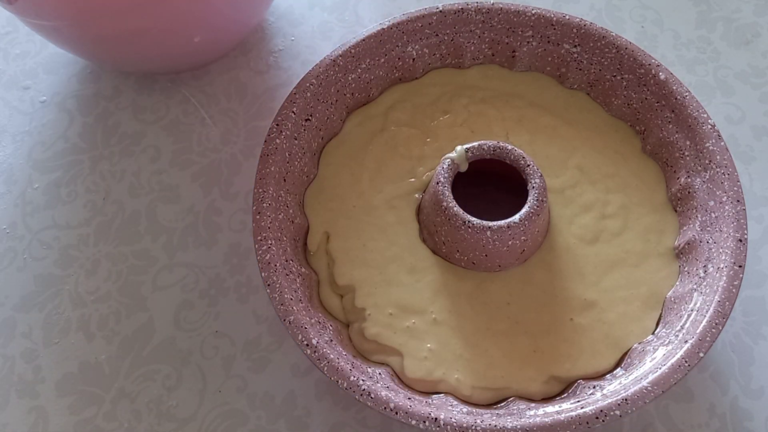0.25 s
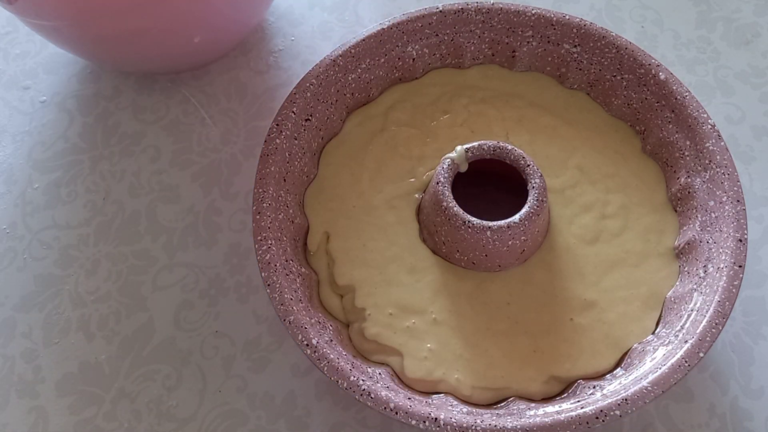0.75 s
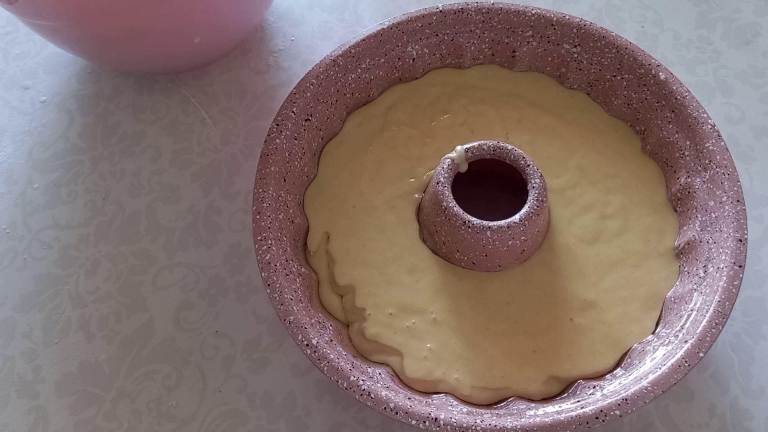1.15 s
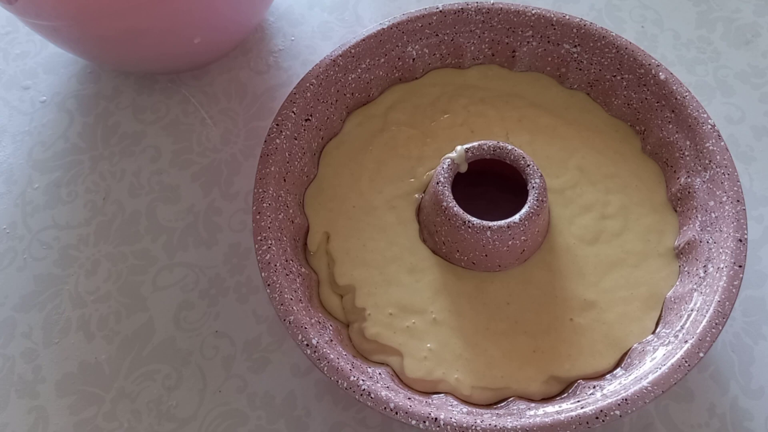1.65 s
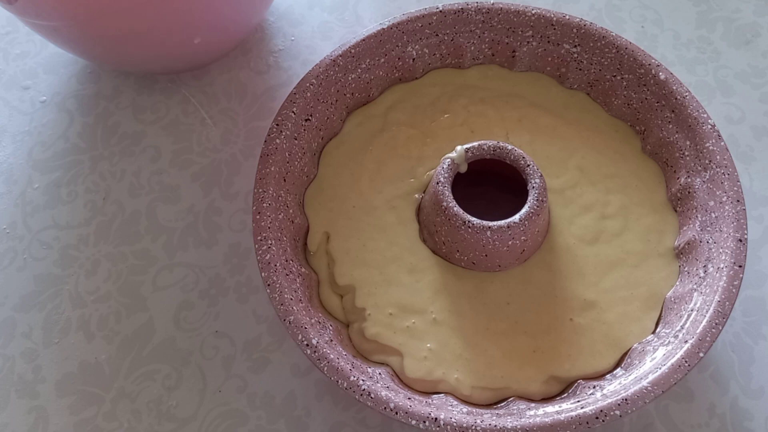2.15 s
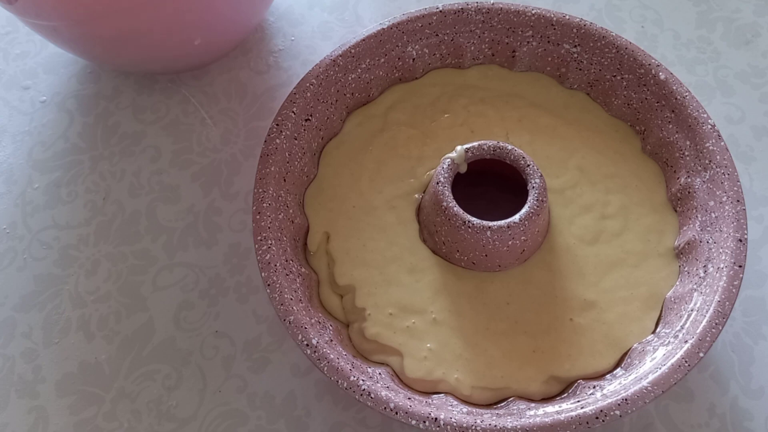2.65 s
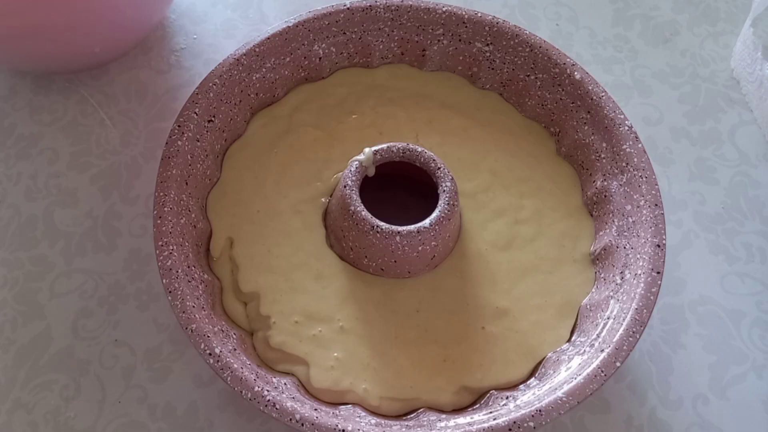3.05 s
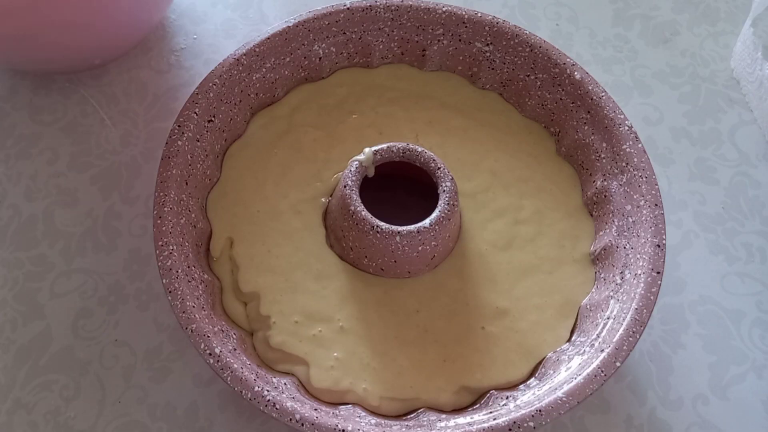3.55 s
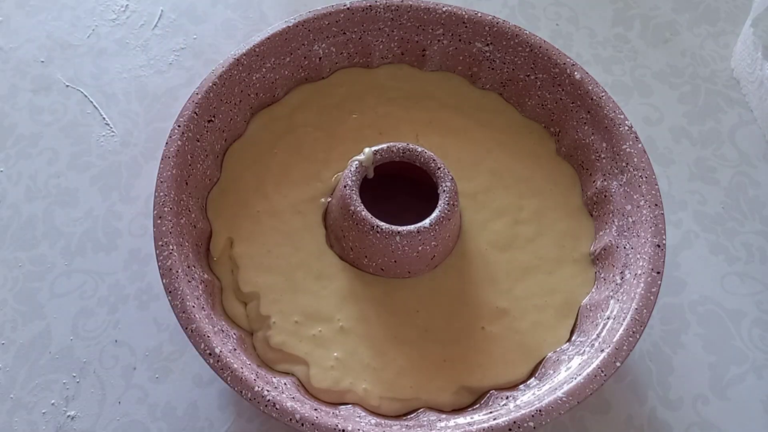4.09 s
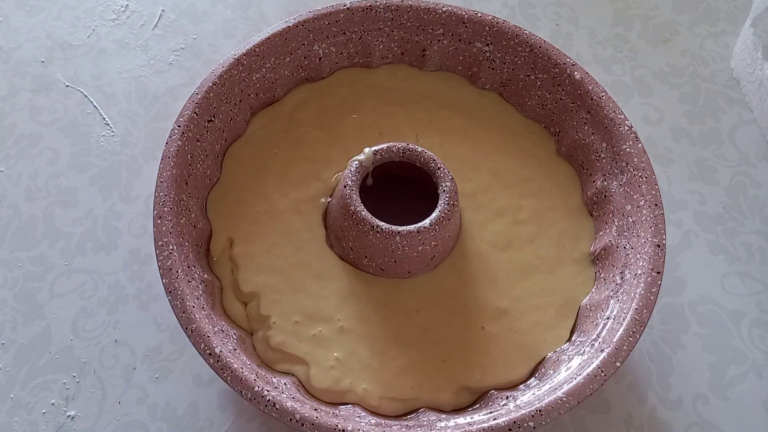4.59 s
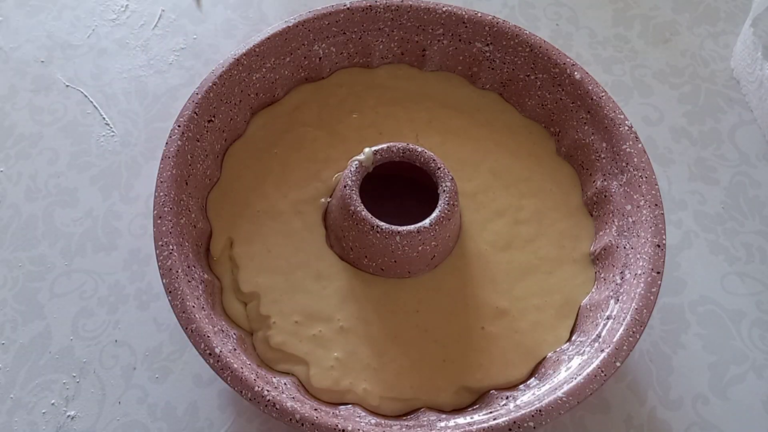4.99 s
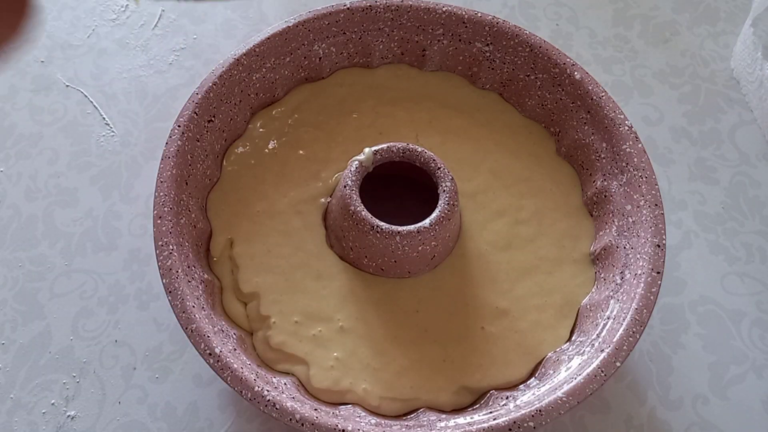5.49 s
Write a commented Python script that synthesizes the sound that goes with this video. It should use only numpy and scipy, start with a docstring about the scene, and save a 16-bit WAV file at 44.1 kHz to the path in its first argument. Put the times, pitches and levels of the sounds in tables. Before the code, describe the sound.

A faint, wavering appliance hum and a soft hiss run throughout in a small kitchen. From the start until about 0.8 seconds, a steel grater rattles and scrapes close by, its panels ringing briefly. Very light rubbing follows, then a second flurry builds from 1.4 seconds to the loudest clatter at 1.7. After a pause, a bowl judders across a wooden table from 2.7 to 3.4 seconds, with low rumbling, gritty scraping and small knocks. It clanks brightly at 3.1 and more softly just after. Faint hollow taps on a dish come at 3.7, a firm, clustered knock on the wood at 4.1, and more soft dish taps around 4.6. Lighter knocks fall between 5.2 and 5.5 seconds, along with three very faint, quick grating strokes. The louder sounds carry a slight, short room echo.

```python
"""A low, wavering appliance hum and a faint hiss lie under a small kitchen throughout. First a steel
grater is rattled and scraped in two flurries, tiny contacts ringing its panels, with light rubbing
between. From 2.7 s a bowl judders over the table among knocks on the wood, then clanks twice.
More knocks and soft hollow taps on a dish follow, and light grating strokes end it at about 5.4 s."""
import sys
import numpy as np
from scipy import signal
from scipy.fft import rfft, irfft, next_fast_len
from scipy.io import wavfile
from scipy.ndimage import uniform_filter1d

SR = 44100
rng = np.random.default_rng(int(sys.argv[2]) if len(sys.argv) > 2 else 0)


def pcm_store(signal):
    """Save signal as 16-bit PCM."""
    levels = np.round(np.clip(np.atleast_2d(signal), -1, 1) * 32767)
    wavfile.write(sys.argv[1], SR, levels.astype(np.int16).T)


N = 252693
TIME = np.arange(N) / SR
SPLIT_LOW_HZ, SPLIT_HIGH_HZ = 1000, 7000


def from_db(db):
    """dB to gain."""
    return 10 ** (np.asarray(db) / 20)


def unit_rms(x):
    """Scale to rms 1."""
    return x / np.sqrt(np.mean(x ** 2) + 1e-20)


def at_hz(points, hz):
    """Read a spectrum table on a log frequency axis."""
    points_hz, values = np.transpose(points)
    return np.interp(np.log(hz), np.log(points_hz), values)


def band(x, low_hz=None, high_hz=None):
    """Steep high-pass, low-pass or both."""
    for hz, kind in ((low_hz, "high"), (high_hz, "low")):
        if hz:
            x = signal.sosfilt(signal.butter(4, hz, kind, fs=SR, output="sos"), x)
    return x


def resonate(x, modes):
    """Parallel resonators of alternating sign, each (Hz, width in Hz, gain in dB)."""
    out = 0
    for k, (hz, width_hz, gain_db) in enumerate(modes):
        radius = np.exp(-np.pi * width_hz / SR)
        gain = (-1) ** k * from_db(gain_db) * (1 - radius ** 2) / 2
        feedback = [1, -2 * radius * np.cos(2 * np.pi * hz / SR), radius ** 2]
        out = out + signal.lfilter([gain, 0, -gain], feedback, x + 1e-18)
    return out


def steady(x, window_s):
    """A driven vibration keeps its strength: chance swells are divided out."""
    return x / np.sqrt(uniform_filter1d(np.mean(x ** 2, axis=0), int(window_s * SR)) + 1e-20)


def burst(t, rise_s, hold_s, t60_s):
    """Envelope: rises until t = 0, holds, decays."""
    attack = np.clip(1 + t / max(rise_s, 1e-3), 0, 1) ** 2
    return attack * from_db(-60 * np.clip(t - hold_s, 0, 1) / t60_s)


def swells(events, rise_s, t60_s):
    """One gain curve per dB column: a burst per row, powers added."""
    return np.sqrt(sum((from_db(levels_db)[:, None] * burst(TIME - time_s, rise_s, hold_s, t60_s)) ** 2
                       for time_s, hold_s, *levels_db in events))


# Likeness of the two ears. Each row: frequency in Hz, left-right correlation.
EAR_CORRELATION = [(30, 0.78), (130, .96), (250, 0.82), (500, 0.58), (1000, 0.31), (2000, 0.),
                   (15000, 0.057)]
def contacts(spectrum, per_s, spread_db):
    """Dense uneven clicks, coloured; the ears share the bass and differ in the treble."""
    clicks = (rng.random((2, N)) < per_s / SR) * rng.standard_normal((2, N))
    clicks *= from_db(spread_db * np.minimum(rng.exponential(1, (2, N)), 4))
    size = next_fast_len(N)
    hz = np.arange(size // 2 + 1) * SR / size + 1
    alike = np.clip(at_hz(EAR_CORRELATION, hz), -1, 1)
    coloured = rfft(clicks, size) * from_db(at_hz(spectrum, hz))
    mid, side = coloured * np.sqrt([1 + alike, 1 - alike])
    return unit_rms(irfft([mid + side, mid - side], size)[:, :N])


# Wavering of the hum. Each row: time in seconds, level in dB.
HUM_LEVELS = [(0, -67), (.65, -58), (.9, -68.5), (1.7, -60.5), (2.6, -71), (3.65, -63.5), (4.45, -66.5),
              (4.6, -62.5), (5.07, -59.5), (5.2, -69), (5.4, -56), (5.62, -71.5), (5.73, -65)]
# Hum resonances. Each row: frequency in Hz, width in Hz, gain in dB.
HUM_MODES = [(77.4, 20, 3), (97.3, 32, -7)]
def appliance_hum():
    """Low noise drives two resonances; the level wavers."""
    rumble = contacts([(40, -8.5), (60, -2), (130, 5), (200, -27)], per_s=SR, spread_db=-4.5)
    level_db = np.interp(TIME, *np.transpose(HUM_LEVELS))
    return from_db(level_db) * steady(resonate(rumble, HUM_MODES), window_s=.08)


# Steady hiss. Each row: frequency in Hz, density in dB.
HISS_SPECTRUM = [(100, -1.5), (400, -7.5), (1000, -9.5), (1900, -16.5), (3000, -25.5), (5000, -29.5),
                 (9000, -33.5), (15500, -27)]
# Thin hiss swells. Each row: time in seconds, hold in seconds, level in dB.
THIN_SWELLS = [(0, 2.06, -81.5), (2.67, 0.49, -83), (3.9, 0.57, -83), (4.89, 0.77, -82)]
# Thin hiss resonance. Each row: frequency in Hz, width in Hz, gain in dB.
THIN_MODES = [(6500, 500, 0)]
def hiss():
    """A broad hiss stays; a thin, high one comes and goes."""
    noise = contacts(HISS_SPECTRUM, per_s=SR, spread_db=-1)
    broad = from_db(-70) * unit_rms(band(noise, 80))
    thin = unit_rms(resonate(band(noise[:, ::-1], 5000, 7800), THIN_MODES))
    return broad + swells(THIN_SWELLS, rise_s=.092, t60_s=1) * thin


def clatter(jolts, spectrum, modes, lows_db, t60_s, ring_db, crest_db, panel_width, scatter_db, detune):
    """Each jolt is a flurry of contacts: broad noise, all modes rung anew, one panel favoured."""
    grains = contacts(spectrum, per_s=12000, spread_db=1.5)
    edges_hz = [(None, SPLIT_LOW_HZ), (SPLIT_LOW_HZ, SPLIT_HIGH_HZ), (SPLIT_HIGH_HZ, None)]
    bands = [unit_rms(band(grains, *edges)) for edges in edges_hz]
    white = contacts([(100, 0), (20000, 0)], per_s=9000, spread_db=1.5)
    loudest_db = max(jolt[1] for jolt in jolts)
    band_power, ringing = np.zeros((3, N)), np.zeros((2, N))
    mode_hz, width_hz, mode_db = np.transpose(modes)
    mode_band = np.digitize(mode_hz, [SPLIT_LOW_HZ, SPLIT_HIGH_HZ])
    hits_db = rng.normal(0, scatter_db, (len(jolts), len(modes)))
    bends = np.exp(rng.normal(0, detune, hits_db.shape))   # a changing grip shifts the modes
    for jolt, hit_db, bend in zip(jolts, hits_db, bends):
        time_s, level_db, highs_db, rise_s, hold_s, panel_hz, panel_db = jolt
        span = slice(max(round((time_s - .06) * SR), 0), round((time_s + .4) * SR))
        envelope = from_db(level_db - crest_db) * burst(TIME[span] - time_s, rise_s, hold_s, t60_s)
        bass_db = lows_db + .17 * (level_db - loudest_db)   # harder jolts shake more bass loose
        band_db = np.array([bass_db, 0, highs_db])
        band_power[:, span] += (from_db(band_db)[:, None] * envelope) ** 2
        rung = zip(mode_hz * bend, width_hz, mode_db + ring_db + hit_db + band_db[mode_band])
        panel = (panel_hz, panel_width * panel_hz, panel_db)
        ringing[:, span] += resonate(white[:, span] * envelope, [*rung, panel])
    return np.sum(np.sqrt(band_power)[:, None] * bands, axis=0) + ringing


# Grater jolts. Each row: time in seconds, level in dB, relative highs in dB, rise and hold in seconds,
# favoured panel's frequency in Hz and gain in dB.
GRATER_JOLTS = [(.006, -31.5, -16, 0.012, 0.043, 2070, 23.5), (.04, -26.5, -2, 0.048, 0.017, 1430, 8),
                (.105, -39, -13, 0.012, 0.1, 2300, 16), (.185, -29.5, -5.5, 0.057, 0.034, 2700, 17.5),
                (.248, -33.5, -17, 0.037, 0.032, 1400, 18.5), (.315, -31.5, -13.5, 0.029, 0.015, 1070, 15),
                (.444, -53.5, -2.5, .005, 0.019, 5500, 17), (.531, -36.5, -8, .01, 0.011, 935, 24.5),
                (.569, -31.5, -18, 0.071, 0.012, 1390, 23), (.631, -30, -2.5, 0.014, 0.016, 1510, 21),
                (.728, -43, -15, .008, 0.027, 2830, 17.5), (.771, -42.5, -7, .004, 0.0066, 10000, 9),
                (1.370, -38, -37.5, 0.011, 0.028, 1129, 13),
                (1.385, -30.5, -10.5, 0.0047, 0.029, 1890, 13.5),
                (1.4425, -34.5, -21.5, 0.023, 0.028, 4503, 9.5),
                (1.526, -25.5, -13.5, 0.02, 0.021, 2509, -0.5),
                (1.559, -24.5, -12, 0.045, 0.043, 1083, 14.5), (1.599, -18.5, -5, .002, 0.022, 465, 24),
                (1.637, -29.5, -9, .01, 0.039, 485, 25), (1.697, -11, -3.5, .016, 0.024, 773, 9)]
# Grater contact noise. Each row: frequency in Hz, density in dB.
GRATER_SPECTRUM = [(71, -43.5), (120, -7.5), (289, -13), (471, -4), (785, -10), (906, -15), (1480, -10),
                   (1780, -10), (8220, -14.5), (9680, -12.5), (10500, -21), (11400, -15), (15800, -13)]
# Steel resonances. Each row: frequency in Hz, width in Hz, gain in dB.
GRATER_MODES = [(166, 40, 1.5), (327, 12, 6.5), (447.2, 52, 6), (794.6, 29, 3.5), (1028, 43, -1),
                (1356, 50, -3.5), (1500, 50, -3.5), (1964, 71, -3), (2501, 80, -3.5), (4260, 280, -7.5),
                (6290, 600, -10.5), (10200, 200, -2), (11640, 530, -1.5), (14350, 280, -5.5)]
def grater_rattle():
    """Jolts ring the steel panels, at slightly different pitches each time."""
    return clatter(GRATER_JOLTS, GRATER_SPECTRUM, GRATER_MODES, lows_db=-10.5, t60_s=.21,
                   ring_db=13.5, crest_db=11.5, panel_width=.06, scatter_db=3, detune=.02)


# Light rubs. Each row: time in seconds, hold in seconds, level in dB.
RUBS = [(.92, 0.21, -74.5), (1.18, 0.44, -71), (3.57, 0.1, -74), (3.71, 0.0041, -63), (4.25, 0.0076, -71)]
# Rubbing noise. Each row: frequency in Hz, density in dB.
RUB_SPECTRUM = [(350, -28), (600, 16), (707, 1.5), (1210, -1), (1790, -14.5), (4420, -9.5), (6580, -11),
                (8420, -23.5), (15800, -27)]
def rubbing():
    """Dense contacts merge into faint, high swells."""
    friction = contacts(RUB_SPECTRUM, per_s=SR, spread_db=4.5)
    return swells(RUBS, rise_s=.13, t60_s=.38) * unit_rms(band(friction, 1500))


# Shoves of the bowl. Each row: time and hold in seconds, then levels in dB of table boom, table groan,
# scrape, scrape highs and bowl ringing.
SHOVES = [(2.68, 0.024, -53, -48, -65, -83, -90), (2.73, .015, -57, -36, -49, -67.5, -62),
          (2.765, 0.023, -40, -36.5, -45, -59.5, -78), (2.841, 0.033, -36.5, -36.5, -38, -53.5, -52),
          (2.91, 0.012, -43, -33, -55, -66, -71), (2.96, 0.056, -44.5, -64, -62.5, -78, -63.5),
          (3.13, 0.067, -44.5, -55, -58.5, -90, -68), (3.239, 0.078, -30.5, -36, -35, -46.5, -42.5),
          (3.35, 0.047, -33, -45, -49.5, -56.5, -57)]
# Grit under the bowl. Each row: frequency in Hz, density in dB.
GRIT_SPECTRUM = [(120, -22), (200, 4), (508, -3.5), (946, -14), (1140, -11.5), (2680, -20.5), (3050, -24),
                 (12700, -36), (15800, -43)]
# Resonances of scrape highs, bowl and table. Each row: frequency in Hz, width in Hz, gain in dB.
SHEEN_MODES = [(2990, 136, 11.5), (10730, 900, 5)]
DRAG_MODES = [(496, 81, 6), (1569, 24, 18)]
BOOM_MODES, GROAN_MODES = [(89, 28, 0)], [(138.2, 49, -5), (180.7, 41, -7.5), (233, 36, -10.5)]
def dragged_bowl():
    """The foot judders, so the table booms and groans; grit scrapes and rings the bowl."""
    boom_gain, groan_gain, *_ = swells(SHOVES, rise_s=.033, t60_s=.19)
    *_, scrape_gain, sheen_gain, ring_gain = swells(SHOVES, rise_s=.021, t60_s=.21)
    judder = contacts([(40, -29), (70, 14.5), (300, -3), (600, -18)], per_s=480, spread_db=1.5)
    grit = contacts(GRIT_SPECTRUM, per_s=4000, spread_db=1)
    boom = boom_gain * steady(resonate(judder, BOOM_MODES), window_s=.0193)
    groan = groan_gain * steady(resonate(resonate(judder, GROAN_MODES), GROAN_MODES), window_s=.046)
    scrape = scrape_gain * unit_rms(band(grit, 194, 3070))
    sheen = sheen_gain * unit_rms(band(grit, 3500, 12200) + resonate(grit, SHEEN_MODES))
    ring = ring_gain * unit_rms(resonate(band(grit, 233), DRAG_MODES))
    return boom + groan + scrape + sheen + ring


def struck(modes, t, soft_s):
    """One decaying sine per mode, of random strength; a soft contact rounds the start."""
    waves = [from_db(db + rng.normal(0, 2.5) - 60 * t / t60_s) * np.sin(2 * np.pi * hz * t)
             for hz, db, t60_s in modes]
    return np.array(waves) * (1 - np.exp(-t / soft_s))


# Knocks on the table. Each row: start in seconds, level in dB, then upper modes, crack and tail
# in relative dB.
KNOCKS = [(2.755, -43, -24, -11.5, -5), (2.771, -39, -25, -13, -28), (2.838, -37, -2, -37, -6),
          (3.54, -72, 3, 4, -15.5), (3.566, -64, -8, 1, -0.5), (4.069, -32, -11, -2.5, -1),
          (4.086, -23.5, -15, -12, -17), (4.096, -20.5, -22, -25, -18), (4.103, -23.5, -12, -19, -30),
          (4.112, -33, -9, -9, -29), (5.248, -35, 4, -5, -4), (5.362, -36, -3.5, -35, -17),
          (5.432, -61.5, 9, 3.5, -24), (5.461, -41.5, -3, -20, -15), (5.502, -69, -6, 4, -8)]
# Table top modes. Each row: frequency in Hz, gain in dB, T60 in seconds.
WOOD_MODES = [(408, -18.5, 0.037), (550, -10.5, 0.065), (616, -4, 0.059), (1330, -6, 0.074),
              (2086, 6, 0.012), (2680, 2.5, 0.016)]
# Noise of knocks and taps. Each row: frequency in Hz, density in dB.
IMPACT_SPECTRUM = [(88, -51), (150, 20), (182, -4.5), (413, 7), (464, 4), (622, -1), (937, -15), (1010, -6),
                   (2630, -2.5), (15800, -33)]
def table_knocks():
    """A knock rings the wood, cracks briefly and leaves a noisy tail."""
    out, t = np.zeros((2, N + SR)), TIME[:SR // 5]
    noise = contacts(IMPACT_SPECTRUM, per_s=5000, spread_db=3.5)
    bright = unit_rms(band(noise, 3170))
    is_upper = np.array(WOOD_MODES)[:, :1] > SPLIT_LOW_HZ
    for start_s, level_db, upper_db, crack_db, tail_db in KNOCKS:
        span = slice(round(start_s * SR), round(start_s * SR) + len(t))
        wood = np.sum(struck(WOOD_MODES, t, soft_s=.0002) * from_db(is_upper * upper_db - 8.5), axis=0)
        crack = bright[:, span] * from_db(crack_db + 2 - 60 * t / .033)
        tail = noise[:, span] * from_db(tail_db - 60 * t / .18)
        out[:, span] += from_db(level_db) * (wood + crack + tail)
    return band(out[:, :N], 257)


# Bowl jolts. Each row: as in GRATER_JOLTS.
BOWL_JOLTS = [(3.117, -21, 0.5, 0.0059, 0.029, 5710, 12), (3.237, -35, -13, 0.0082, 0.0086, 5790, 29)]
# Bowl contact noise. Each row: frequency in Hz, density in dB.
BOWL_SPECTRUM = [(120, -41), (200, -15), (340, -17), (706, 7), (848, -27.5), (1970, -13.5), (2280, -25),
                 (3400, -17), (5780, -21.5), (8640, -31.5), (15800, -27.5)]
# Bowl resonances. Each row: frequency in Hz, width in Hz, gain in dB.
BOWL_MODES = [(711, 64, 8), (1450, 40, -2), (1950, 150, -.5), (3370, 50, 11.5), (5400, 120, 4),
              (5900, 120, 5), (6480, 70, 0), (7110, 40, 2), (11600, 140, -9), (14300, 100, -6)]
def bowl_clanks():
    """Two jolts ring the bowl at nearly constant pitch."""
    return clatter(BOWL_JOLTS, BOWL_SPECTRUM, BOWL_MODES, lows_db=-12.5, t60_s=.23,
                   ring_db=13, crest_db=15, panel_width=.05, scatter_db=1.5, detune=.002)


# Soft taps. Each row: start in seconds, level in dB, left over right in dB.
TAPS = [(3.695, -47, -9), (3.714, -45.5, -4), (4.619, -32, -5), (4.644, -40.5, 8), (4.681, -40.5, -4)]
# Dish modes. Each row: frequency in Hz, gain in dB, T60 in seconds.
DISH_MODES = [(389.4, -13, 0.1), (521, 2.5, 0.11), (588, -2, 0.17), (628.6, 4, 0.068), (719, -0.5, 0.048)]
def dish_taps():
    """A tap clicks faintly and rings a hollow dish."""
    out, t = np.zeros((2, N + SR)), TIME[:SR // 5]
    noise = contacts(IMPACT_SPECTRUM, per_s=5000, spread_db=3.5)
    for start_s, level_db, pan_db in TAPS:
        span = slice(round(start_s * SR), round(start_s * SR) + len(t))
        ring = struck(DISH_MODES, t, soft_s=.0016).sum(axis=0)
        click = band(noise[:, span], high_hz=2800) * from_db(-20.5 - 60 * t / .078)
        pan = from_db([[pan_db / 2], [-pan_db / 2]])
        out[:, span] += from_db(level_db - 11.5) * pan * (ring + click)
    return band(out[:, :N], 257)


# Grating strokes. Each row: time in seconds, hold in seconds, level in dB.
STROKES = [(5.33, .015, -59.5), (5.41, 0.021, -59), (5.5, 0.02, -62)]
# Grating noise. Each row: frequency in Hz, density in dB.
STROKE_SPECTRUM = [(350, -33), (600, 0), (856, -3), (1330, -7.5), (1770, -14), (3100, -16.5), (3550, -20.5),
                   (6760, -18), (15800, -33)]
def grating_strokes():
    """Fine contacts rasp in three light swells."""
    rasp = contacts(STROKE_SPECTRUM, per_s=4600, spread_db=-1)
    return swells(STROKES, rise_s=.13, t60_s=.38) * unit_rms(band(rasp, 1390))


def kitchen(x, t60_s=.22, wall_cut_hz=5700):
    """Wall echoes: six feedback delays a side, duller on every round."""
    size = next_fast_len(N + SR // 2)
    angle = 2 * np.pi * np.arange(size // 2 + 1) / size
    pole = np.exp(-2 * np.pi * wall_cut_hz / SR)
    wall = (1 - pole) / (1 - pole * np.exp(-1j * angle))
    response = np.zeros((2, len(angle)), complex)
    lags = (rng.uniform(.0087, .03, size=12) * SR).astype(int)
    for k, lag in enumerate(lags):
        loop = from_db(-60 * lag / SR / t60_s) * wall * np.exp(-1j * lag * angle)
        response[k % 2] += (-1) ** (k // 2) * loop / (1 - loop)
    return irfft(rfft(x, size) * response, size)[:, :N]


def scene():
    """The louder sounds echo in the small room, which adds little bass; the faint ones stay dry."""
    table = grater_rattle() + bowl_clanks() + dragged_bowl() + table_knocks() + dish_taps()
    echoes = from_db(-13) * kitchen(band(table, 700))
    return table + echoes + appliance_hum() + hiss() + rubbing() + grating_strokes()


def record(dry):
    """Steep low-pass at 15.9 kHz."""
    return signal.sosfilt(signal.ellip(12, .5, 75, 15900, fs=SR, output="sos"), dry)


dry = scene()
out = record(dry)
pcm_store(out)
```